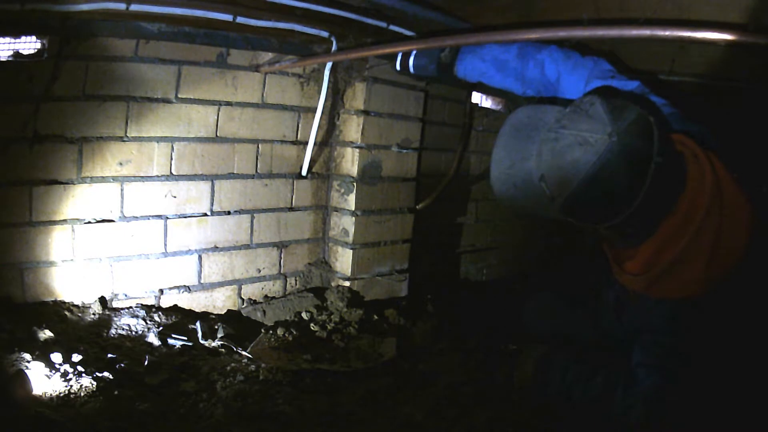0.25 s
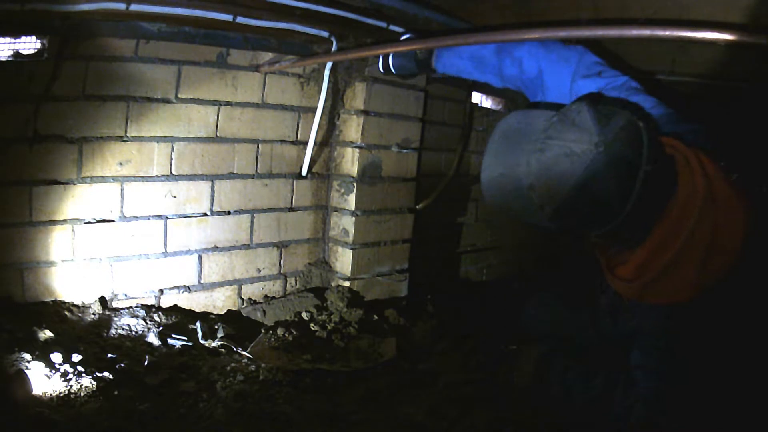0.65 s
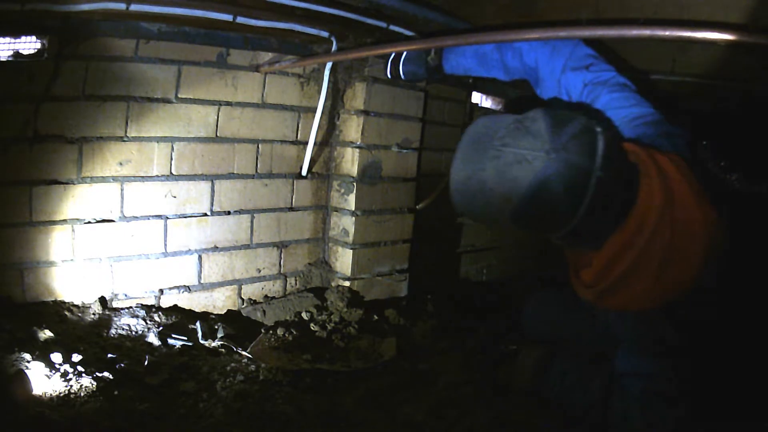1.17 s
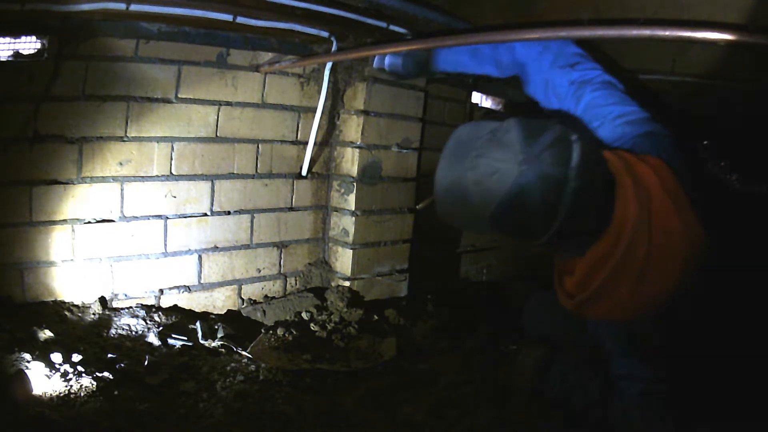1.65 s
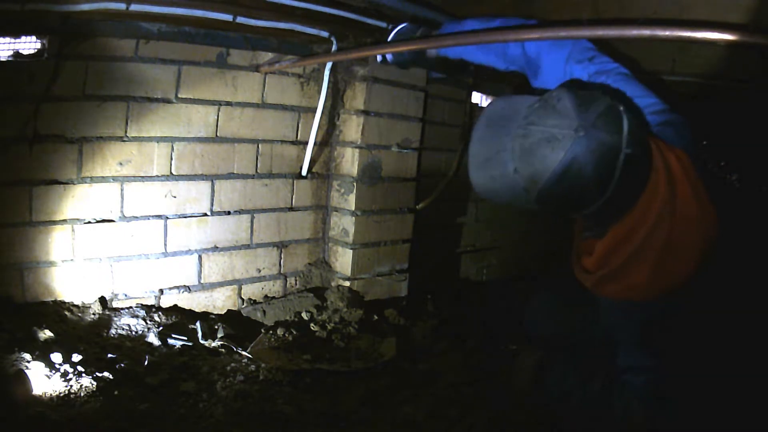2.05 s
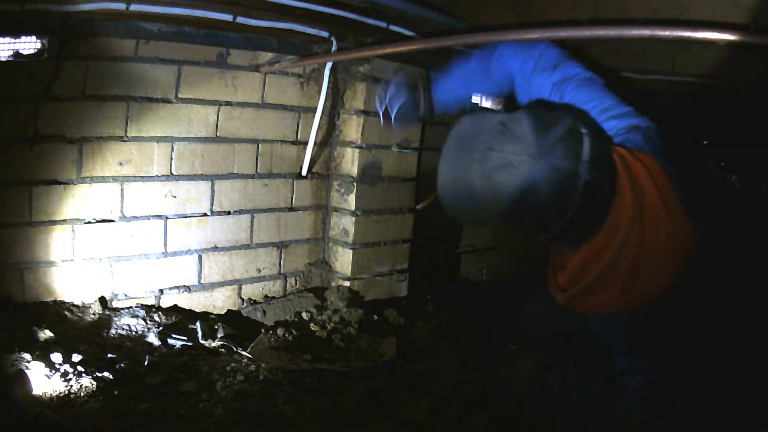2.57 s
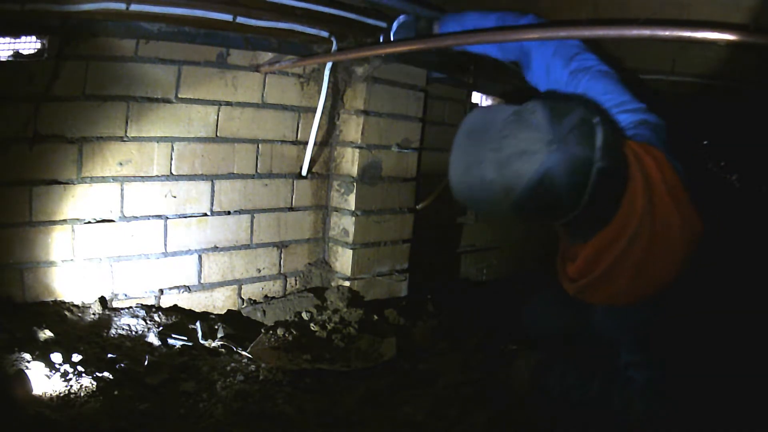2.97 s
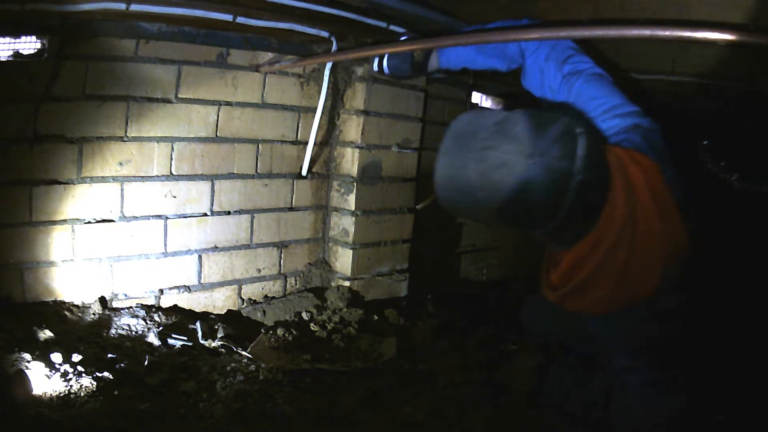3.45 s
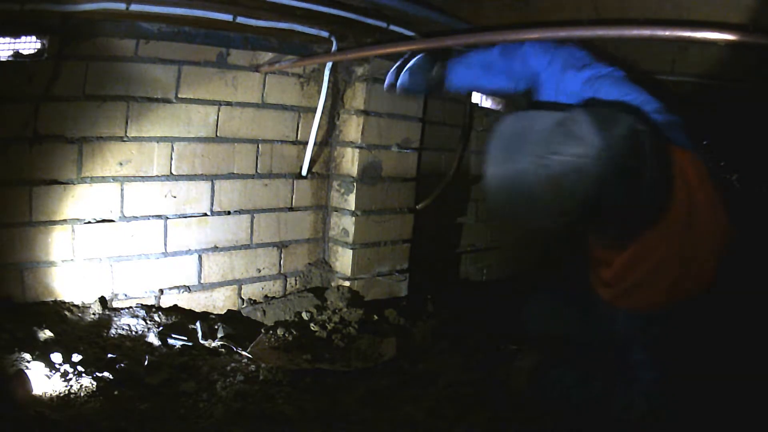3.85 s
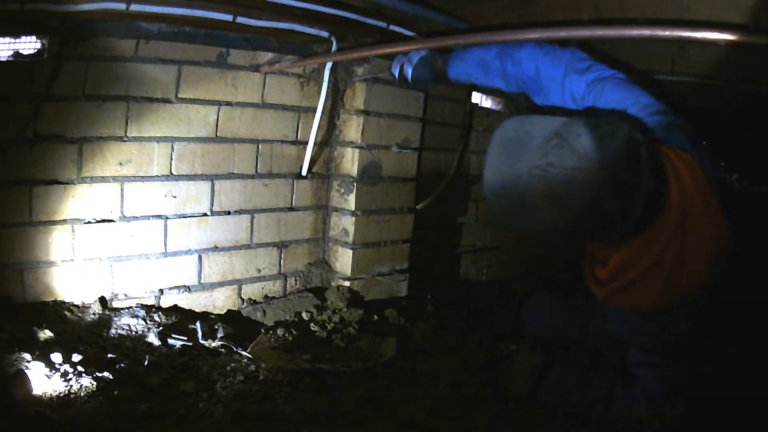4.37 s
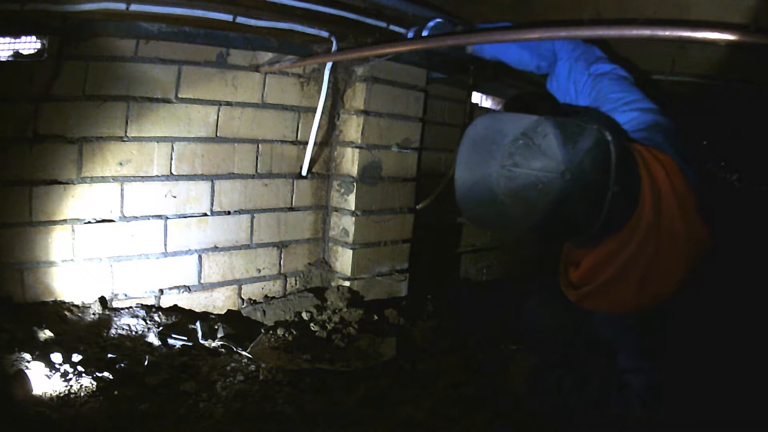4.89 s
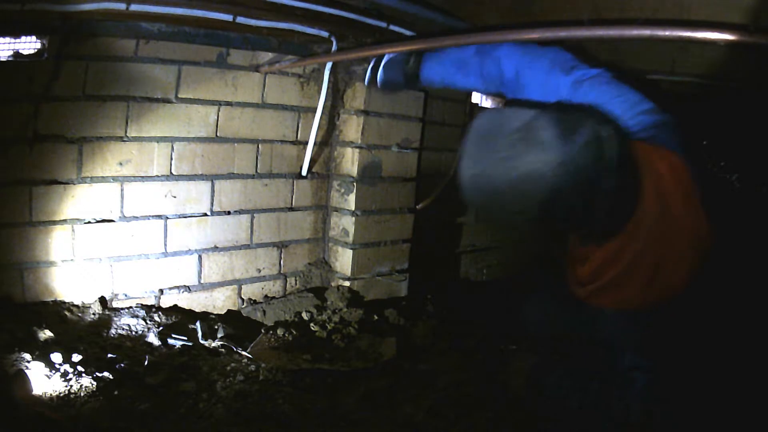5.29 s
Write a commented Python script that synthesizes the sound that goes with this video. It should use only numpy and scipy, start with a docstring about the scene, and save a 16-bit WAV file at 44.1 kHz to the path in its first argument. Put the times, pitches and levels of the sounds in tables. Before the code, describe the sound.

A gloved hand picks dried mud off brickwork with small cracks, scrapes and dull knocks, over a steady low machine hum.

```python
"""A slow machine hums over a dull rumble in a low crawl space; close by, dried mud starts to snap.
A gloved hand is picking mud tubes off a brick pier: the crust cracks, rasps and ticks with small breaks.
Harder breaks knock on the masonry and thud in the floor timbers above; the near walls answer briefly.
The camera's muffled microphone hisses thinly, and its electronics add faint, regular pairs of ticks."""
import sys
import numpy as np
from scipy import signal
from scipy.fft import rfft, irfft, next_fast_len
from scipy.io import wavfile
from scipy.ndimage import map_coordinates

SR = 44100
rng = np.random.default_rng(int(sys.argv[2]) if len(sys.argv) > 2 else 0)


def persist_wave(psi):
    """Save psi, clipped to +-1, as 16-bit WAV."""
    counts = np.round(np.clip(psi, -1, 1) * 32767).astype(np.int16)
    wavfile.write(sys.argv[1], SR, np.atleast_2d(counts).T)


N = 243873

# spectrum of breaking mud crust: (frequency [Hz], relative level [dB])
CRUST_SPECTRUM = [(100, -22.5), (330, -6.5), (500, 0), (1000, 8.5), (1450, -10.5), (1800, 3), (2200, -16.5),
                  (3000, -23.5), (3900, -39.5), (4500, -58.5), (6000, -87)]
# spectrum of fine grit: (frequency [Hz], relative level [dB])
GRIT_SPECTRUM = [(1200, -21), (2200, 10), (2800, -0.5), (3900, -3), (4500, -18.5), (5400, -22.5),
                 (6300, -10), (7300, -3.5), (8100, -11.5), (8900, -34)]
PIER_LOW_HZ, PIER_HIGH_HZ = 400, 720  # the pier rings in this band, the timbers below, the crust above


def amp(db):
    """Decibels to gain."""
    return 10 ** (np.asarray(db) / 20)


def unit(x, size=None):
    """x scaled to rms 1, over its first size samples if given."""
    return x / np.sqrt(np.mean(x[:size] ** 2) + 1e-20)


def along(points, hz):
    """(frequency [Hz], value) points read on a log axis."""
    freqs, values = np.transpose(points)
    return np.interp(np.log(hz + 1), np.log(freqs + 1), values)


def wobble(rate, size):
    """A smooth random curve, rate knots a second."""
    knots = rng.standard_normal(int(size * rate / SR) + 4)
    return map_coordinates(knots, [np.arange(size) * rate / SR])


def add(track, time, sound):
    """Mixes a sound into the track at a time in seconds."""
    start = max(round(time * SR), 0)
    track[start:start + len(sound)] += sound[:max(N - start, 0)]


def filtered(x, response):
    """x through a complex frequency response."""
    size = 2 * next_fast_len(len(x) // 2 + 4096)
    return irfft(rfft(x, size) * response(np.fft.rfftfreq(size, 1 / SR)), size)[:len(x)]


def coloured(x, spectrum):
    """x through a minimum-phase filter with the given spectrum."""
    def response(hz):
        cepstrum = irfft(np.log(amp(along(spectrum, hz))))
        cepstrum[1:len(hz) - 1] *= 2
        cepstrum[len(hz):] = 0
        return np.exp(rfft(cepstrum))
    return filtered(x, response)


def machine(turn_hz=26.66):
    """A slow shaft hums on multiples of its turning rate, slightly unsteady in speed and strength."""
    # partials of the hum: (multiple of the turning rate, rms level [dB])
    partials = [(1, -36.5), (2, -28.5), (5, -51), (6, -54.5), (7, -59), (8, -56), (9, -66.5)]
    turns = np.cumsum(turn_hz * (1 + 0.0016 * wobble(1.7, N))) / SR
    out = np.zeros(N)
    for multiple, db in partials:
        peak = np.sqrt(2) * amp(db + 0.63 * wobble(3.77, N))
        out += peak * np.sin(2 * np.pi * (multiple * turns + rng.random()))
    return out


def background():
    """Dull rumble under the house and the thin hiss of the microphone."""
    # air of the crawl space: (frequency [Hz], relative level [dB])
    rumble_spectrum = [(15, 2), (30, -5), (65, 1), (90, -5.5), (120, -11.5), (160, -9), (200, -16.5),
                       (300, -22.5), (550, -25), (1000, -30.5), (1600, -36), (2200, -45.5), (3500, -55),
                       (5000, -74.5)]
    # microphone self-noise: (frequency [Hz], relative level [dB])
    hiss_spectrum = [(3000, -31.5), (4500, -12), (5400, -14), (6100, -3.5), (6750, 2.5), (7600, -5.5),
                     (8400, -20), (9000, -32.5)]
    rumble = unit(coloured(rng.standard_normal(N), rumble_spectrum))
    rumble *= amp(-38.5 + 1.9 * wobble(4.79, N))
    hiss = amp(-82.5) * unit(coloured(rng.standard_normal(N), hiss_spectrum))
    return rumble + hiss


def fractures(size, rate, spread_db):
    """Tiny fractures at random moments, rate a second, a few much larger than the rest."""
    happens = rng.random(size) < rate / SR
    signs = rng.choice([-1, 1], size)
    strengths = amp(spread_db * np.minimum(rng.exponential(size=size), 4))
    return unit(happens * signs * strengths)


def ring(force, low_hz, high_hz, damping=1, soft_hz=2315):
    """The structure's resonances in one band; each contact point tunes and weights them anew."""
    # modes of timbers, pier and crust: (frequency [Hz], undamped width [Hz], relative level [dB])
    resonances = [(160, 20, 0.5), (242, 45, 2), (304, 60, -9), (444.6, 33, -9.5), (524.3, 27, -8),
                  (603.5, 37.8, 0.5), (654, 150, -12.5), (748, 87, 1), (928.4, 71.4, 8), (1029, 110, -3.5),
                  (1095, 63, 0.5), (1324, 60, -2), (1406, 60, 0.5), (1554, 130, -5), (1768, 130, -8.5),
                  (1980, 120, -23)]
    modes = [(f * (1 + .007 * rng.standard_normal()), width * damping, db + 3.5 * rng.standard_normal())
             for f, width, db in resonances if low_hz <= f < high_hz]
    # crumbly mud cannot push faster than soft_hz
    softening = signal.butter(6, min(soft_hz, 2 * high_hz), fs=SR, output="sos")

    def response(hz):
        return sum((-1) ** k * amp(db) * 1j * hz * width / (f * f - hz * hz + 1j * hz * width)
                   for k, (f, width, db) in enumerate(modes))
    return filtered(signal.sosfilt(softening, force), response)


def mud_piece(force, crunch, pitch_hz, boost=1.8, sharpness=3.1):
    """A piece of mud damps the upper resonances, adds its crunch and stresses its own pitch."""
    def response(hz):
        band = 1j * hz * pitch_hz
        return 1 + boost * band / (sharpness * (pitch_hz ** 2 - hz * hz) + band)
    return filtered(unit(ring(force, PIER_HIGH_HZ, SR, damping=1.26)) + crunch, response)


def cracks(medium_db=-44, medium_t60=.05, push_t60=0.18, free_t60=0.038):
    """Each break is one fracture and an avalanche of smaller ones; it shakes pier and timbers."""
    # breaks of the crust: (time [s], snap level [dB], knock [dB re snap], crumbling t60 [s],
    # pitch of the piece [Hz], treble gain, up for brittle flakes and down for soft [dB])
    breaks = [(0.1185, -31, 0.5, 0.017, 760, -6.5), (0.164, -46, -13, 0.016, 960, -2.5),
              (0.201, -47, -14, 0.024, 930, -0.5), (0.209, -45.5, -16, .025, 980, 2.5),
              (0.372, -53.5, 4.5, 0.042, 740, 0), (1.0107, -48.5, -2, 0.044, 1350, 3),
              (1.107, -48, 3, 0.072, 950, -2.5), (1.119, -54, 0, .02, 1100, -1),
              (1.5906, -47, -2.5, 0.04, 1100, -1.5), (1.84, -44.5, 3, 0.026, 1200, -2),
              (1.851, -34, -6, 0.032, 970, 2), (1.984, -35.5, -0.5, 0.035, 980, -8),
              (2.02, -28.5, -6.5, 0.026, 980, -7.5), (2.0255, -28.5, -16.5, 0.024, 995, -4),
              (2.037, -26.5, -10.5, 0.026, 974, -4.5), (2.054, -26.5, -11, 0.036, 1200, -0.5),
              (2.106, -45.5, -4.5, 0.021, 1480, -2), (2.3102, -40.5, -20.5, 0.036, 990, 0),
              (2.5184, -45.5, -4, 0.21, 920, -0.5), (2.8005, -29, -10.5, 0.048, 1320, 0.5),
              (2.8055, -25, 3, 0.058, 980, -4), (2.8115, -27, -1, 0.05, 1390, 2.5),
              (2.829, -37, -3.5, 0.14, 1300, -2.5), (2.844, -39.5, -3, 0.056, 1350, -4.5),
              (2.879, -43, -7.5, .03, 953, 0), (2.899, -43.5, -1.5, 0.091, 1370, -1.5),
              (3.1438, -39.5, -13, 0.022, 1010, -1.5), (3.165, -37, -14, 0.022, 970, -1),
              (3.2474, -44.5, -10, 0.055, 1400, -0.5), (3.29, -43, -14.5, 0.06, 1300, 0),
              (3.4219, -42, 5, 0.064, 950, -0.5), (3.6653, -45, -5, 0.15, 1465, -1.5),
              (3.7528, -44.5, -20, 0.081, 1450, 2.5), (4.1014, -42, 3, 0.11, 910, -1),
              (4.35, -44.5, 2, 0.058, 770, -1.5), (4.365, -41, 3, 0.042, 837, -0.5),
              (4.489, -40, -2.5, 0.045, 1100, 9), (4.912, -50.5, -1, 0.037, 995, -1.5),
              (5.082, -33, -0.5, 0.081, 990, 1.5), (5.095, -38, 2.5, 0.055, 885, -1),
              (5.116, -28, -4, 0.031, 1050, 3), (5.124, -32, -4, 0.051, 1060, -1),
              (5.2205, -53, 0.5, 0.014, 1000, -4), (5.465, -48.5, 2.5, 0.0077, 960, -4)]
    out, t = np.zeros(N), np.arange(SR // 4) / SR
    for time, db, knock_db, t60, pitch_hz, bite_db in breaks:
        avalanche = amp(-60 * t / t60) * fractures(len(t), rate=5200, spread_db=2.5)
        crumble = 1.83 * t60 / medium_t60  # a short snap is mostly one fracture
        force = signal.unit_impulse(len(t)) + crumble * avalanche / np.linalg.norm(avalanche)
        # small flakes radiate little bass
        flakes = filtered(coloured(force, CRUST_SPECTRUM), lambda hz: 1j * hz / (900 + 1j * hz))
        crust = mud_piece(force, 0.58 * unit(flakes), pitch_hz)
        snap = unit(coloured(crust, [(1500, 0), (2500, bite_db)]), size=530)
        blow = force * amp(-60 * t / push_t60)  # the first fractures carry the push
        grip = 0.98 * max(free_t60 / t60, 1)  # the fingers stay on after a short snap and damp the pier
        knock = amp(knock_db) * unit(ring(blow, PIER_LOW_HZ, PIER_HIGH_HZ, damping=grip), size=530)
        thud = amp(knock_db - 19) * unit(ring(blow, 0, PIER_LOW_HZ), size=1300)
        # a big snap comes off cleaner; long crumbling sheds more grit
        grit_db = -25 - 0.54 * (db - medium_db) + 3 * np.log2(t60 / medium_t60)
        grit = amp(grit_db) * unit(coloured(avalanche, GRIT_SPECTRUM), size=530)
        add(out, time, amp(db) * (snap + knock + thud + grit))
    return out


def walls(x, block_s=.1, delay_s=0.0059):
    """Brick and soil close around the microphone give a short, diffuse echo, drawn afresh each block."""
    # decay of the crawl space: (frequency [Hz], t60 [s])
    decay_times = [(150, 0.025), (600, 0.25), (1500, 0.072), (8000, 0.11)]
    out, size = np.zeros(N), round(block_s * SR)
    for start in range(0, N, size):
        hz, t, noise = signal.stft(rng.standard_normal(SR // 4), SR, nperseg=256)
        decay = amp(-60 * t / along(decay_times, hz)[:, None])
        _, tail = signal.istft(noise * decay, SR, nperseg=256)
        answer = signal.fftconvolve(x[start:start + size], tail / np.linalg.norm(tail))
        add(out, start / SR + delay_s, answer)
    return out


def camera_ticks(pitch_hz=6600, width_s=0.00067, peak_db=-62.0, first_s=.127, period_s=.2, gap_s=0.042):
    """The camera's electronics leak short high pips in regular pairs, the second a little unsteady."""
    out, t = np.zeros(N), np.arange(-SR // 500, SR // 500) / SR
    pip = np.exp(-.5 * (t / width_s) ** 2) * np.sin(2 * np.pi * pitch_hz * t)
    for beat in np.arange(first_s, N / SR, period_s):
        for time in (beat, beat + gap_s + 0.004 * rng.standard_normal()):
            add(out, time + t[0], amp(peak_db + rng.standard_normal()) * pip)
    return out


def stroke(length_s, slip_db=2.2, slips_per_s=88):
    """The glove's pressure, padded to half a second: it swells, catches and slips, and lets go."""
    progress = np.arange(SR // 2) / SR / length_s
    press = np.clip(progress / 0.19, 0, 1)
    release = np.clip((1 - progress) / 0.42 + .5, 0, 1)
    return press * release * amp(slip_db * wobble(slips_per_s, len(progress)))


def rubs(coarse_hz=950, coarse_grit_db=-29, grit_db_per_octave=29.5):
    """The glove catches and slips on the crust, so its grains come in clumps."""
    # strokes over the mud: (start [s], end [s], rasp level [dB], grit level [dB])
    strokes = [(0.211, 0.25, -51, -69.5), (0.875, 1.143, -54, -71.5), (1.632, 1.692, -36.5, -68.5),
               (1.844, 1.941, -43, -71.5), (2.02, 2.076, -46, -55.5), (2.087, 2.243, -59.5, -76),
               (2.365, 2.403, -45.5, -65), (2.52, 2.683, -46, -78.5), (2.675, 2.8, -53.5, -77.5),
               (2.839, 2.875, -39.5, -67), (2.981, 3.033, -48.5, -66.5), (3.038, 3.357, -56.5, -73.5),
               (3.331, 3.506, -52, -81.5), (3.566, 3.643, -47, -78.5), (3.743, 3.886, -51, -70),
               (3.884, 4.18, -59.5, -88), (4.188, 4.32, -46, -73), (4.331, 4.436, -48, -73),
               (5.115, 5.148, -45.5, -76.5), (5.385, 5.451, -55, -78)]
    out = np.zeros(N)
    for start, end, rasp_db, grit_db in strokes:
        pressure = stroke(end - start)
        size = len(pressure)
        # the grittier the patch, the smaller and higher its crumbs
        pitch_hz = coarse_hz * 2 ** ((grit_db - rasp_db - coarse_grit_db) / grit_db_per_octave)
        force = pressure * fractures(size, rate=1300, spread_db=1.9)
        crust = mud_piece(force, 0.98 * unit(coloured(force, CRUST_SPECTRUM)), pitch_hz)
        pier = ring(force, PIER_LOW_HZ, PIER_HIGH_HZ, damping=2.9)  # damped by the glove
        shake = 0.78 * coarse_hz / pitch_hz  # small crumbs shake the pier less
        rasp = unit(unit(crust) + shake * unit(pier))
        grit = unit(coloured(pressure * fractures(size, rate=800, spread_db=2.0), GRIT_SPECTRUM))
        contact = np.sqrt((end - start) * SR / size)  # the levels hold while the glove is in contact
        add(out, start, contact * (amp(rasp_db) * rasp + amp(grit_db) * grit))
    return out


def small_breaks(t60=0.042, pitch_hz=1200):
    """Small breaks in the crust tick and crackle briefly."""
    # small breaks of the crust: (time [s], tick level [dB], grit level [dB])
    breaks = [(0.927, -57, -82), (0.946, -47.5, -76), (0.973, -54, -71.5), (1.012, -54, -64.5),
              (1.036, -55, -69.5), (1.052, -54.5, -67), (1.623, -50.5, -76), (1.914, -60, -78),
              (2.002, -41.5, -62), (2.861, -46.5, -58), (3.015, -46.5, -64.5), (3.086, -47, -75),
              (3.116, -55, -63.5), (3.127, -46, -72), (3.191, -57, -64), (3.251, -52, -64),
              (3.274, -46.5, -77), (3.293, -49, -65), (3.331, -54.5, -64.5), (3.464, -45.5, -67),
              (3.773, -49.5, -61), (3.794, -52, -79), (3.825, -48.5, -66), (3.837, -44, -65),
              (4.192, -48.5, -75.5), (4.226, -50, -71), (4.251, -47.5, -74)]
    out, t = np.zeros(N), np.arange(SR // 8) / SR
    for time, tick_db, grit_db in breaks:
        crackle = amp(-60 * t / t60) * fractures(len(t), rate=2100, spread_db=2.5)
        force = signal.unit_impulse(len(t)) + 3.3 * crackle / np.linalg.norm(crackle)
        tick = mud_piece(force, 0.22 * unit(coloured(force, CRUST_SPECTRUM)), pitch_hz)
        grit = coloured(force, GRIT_SPECTRUM)
        add(out, time, amp(tick_db) * unit(tick, size=440) + amp(grit_db) * unit(grit, size=440))
    return out


def shoves():
    """The weight of hand and arm thuds dully in the timbers overhead."""
    # shoves against the pier: (time [s], level [dB], length [s], timber ring [dB re push])
    pushes = [(1.642, -41.5, 0.054, 4), (2.365, -44, .06, -3), (2.812, -35, .045, 10.5),
              (3.412, -39, 0.055, -0.5), (3.657, -42, .065, -6.5), (4.111, -39.5, 0.073, -8.5),
              (5.085, -35, 0.064, -7)]
    # dull push of hand and arm: (frequency [Hz], relative level [dB])
    push_spectrum = [(40, -24.5), (85, 11), (140, 8), (220, -11), (320, -21.5), (700, -41), (2000, -85.5)]
    out = np.zeros(N)
    for time, db, length_s, timber_db in pushes:
        pressure = stroke(length_s)
        force = pressure * fractures(len(pressure), rate=2200, spread_db=1.0)
        timbers = amp(timber_db) * unit(ring(force, 0, PIER_LOW_HZ))
        push = unit(coloured(force, push_spectrum))
        add(out, time, amp(db) * unit(timbers + push, size=round(length_s * SR)))
    return out


def chink(start_s=3.003, width_hz=600, swell_s=.012):
    """One hard crumb gives a faint, rough high ring that swells briefly and dies away."""
    # ring of the crumb: (pitch [Hz], level [dB], t60 [s])
    hard_crumb = (3209, -63, 0.064)
    pitch_hz, db, t60 = hard_crumb
    out, t = np.zeros(N), np.arange(SR // 4) / SR
    phase = 2 * np.pi * pitch_hz * t
    tone = wobble(width_hz, len(t)) * np.sin(phase) + wobble(width_hz, len(t)) * np.cos(phase)
    envelope = amp(-60 * t / t60) * (1 - np.exp(-t / swell_s))
    add(out, start_s, amp(db) * unit(tone * envelope, size=1000))
    return out


def scene():
    """One microphone near the pier: the hand's work and the walls' answer, over the steady sounds."""
    mud = cracks() + small_breaks() + rubs() + shoves() + chink()
    return (mud + amp(-11.0) * walls(mud) + machine() + background() + camera_ticks())[None]


def record(dry):
    """The camera keeps nothing above its band limit."""
    top_hz = 8900
    return np.array([filtered(channel, lambda hz: hz < top_hz) for channel in dry])


dry = scene()
out = record(dry)
persist_wave(out)
```